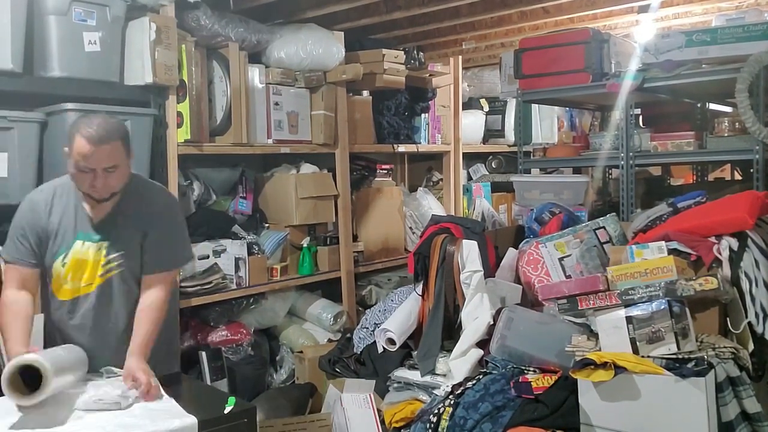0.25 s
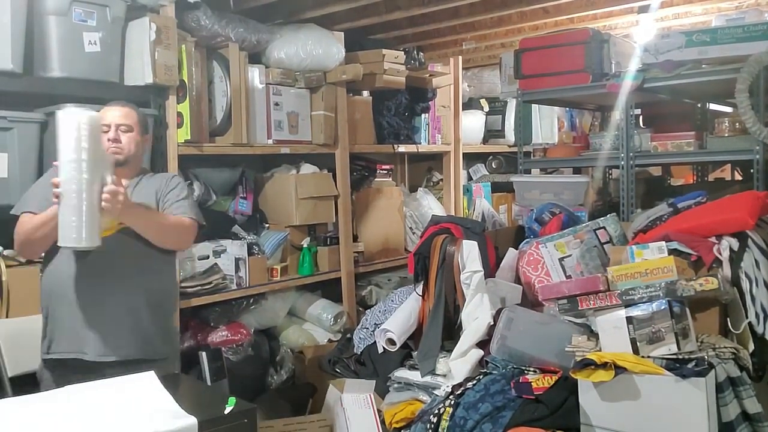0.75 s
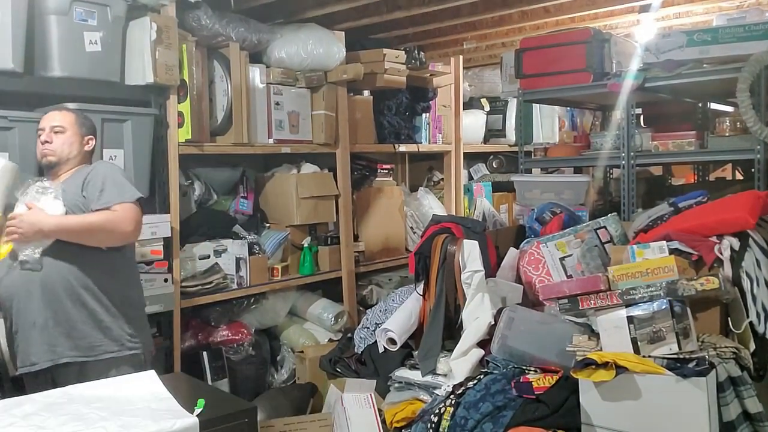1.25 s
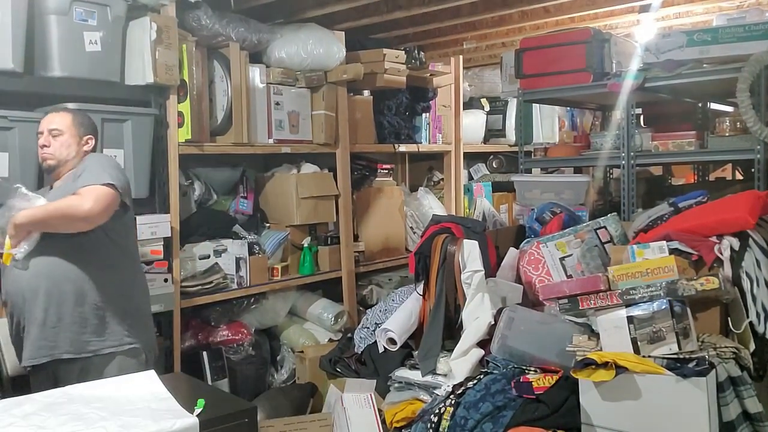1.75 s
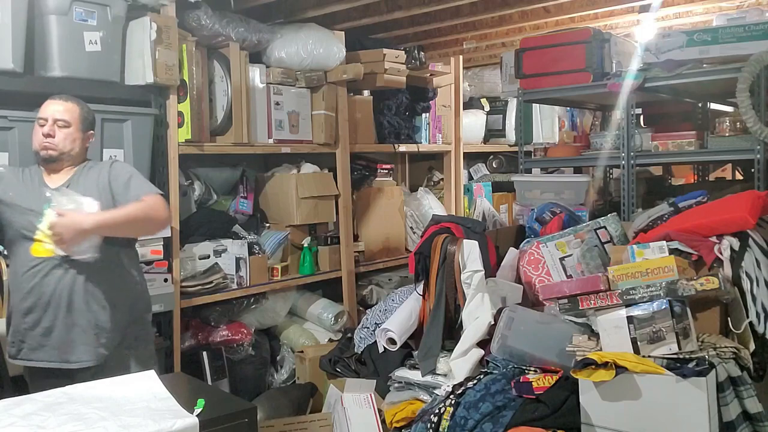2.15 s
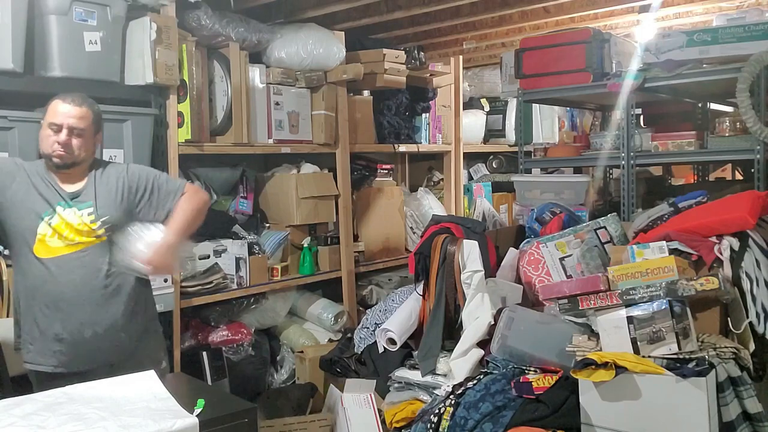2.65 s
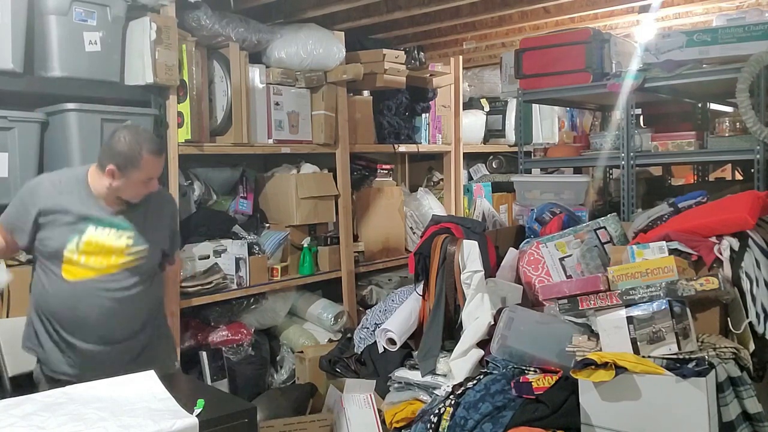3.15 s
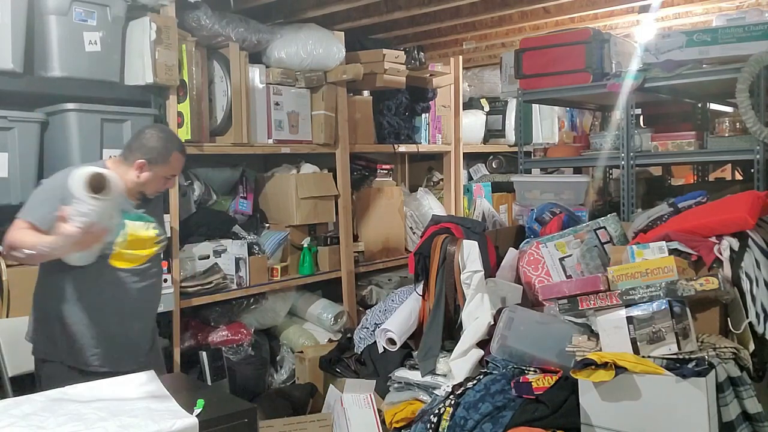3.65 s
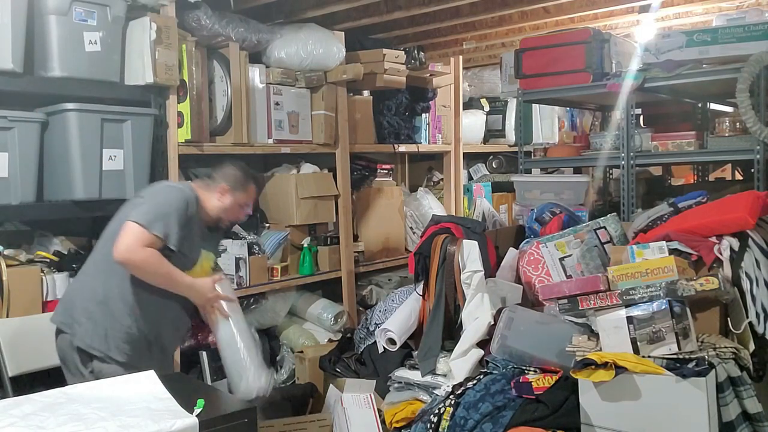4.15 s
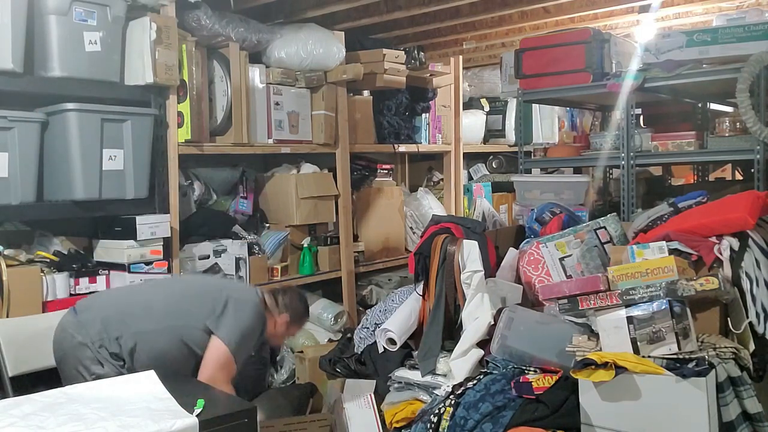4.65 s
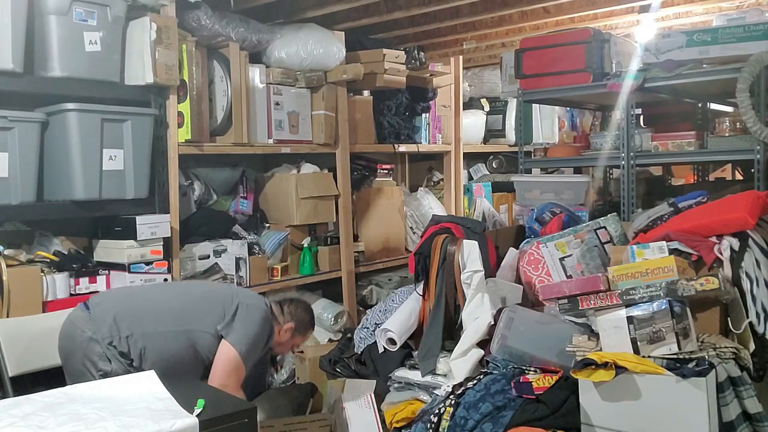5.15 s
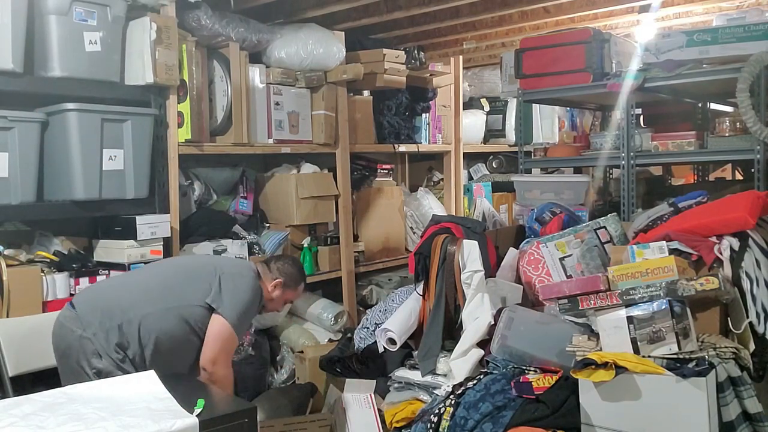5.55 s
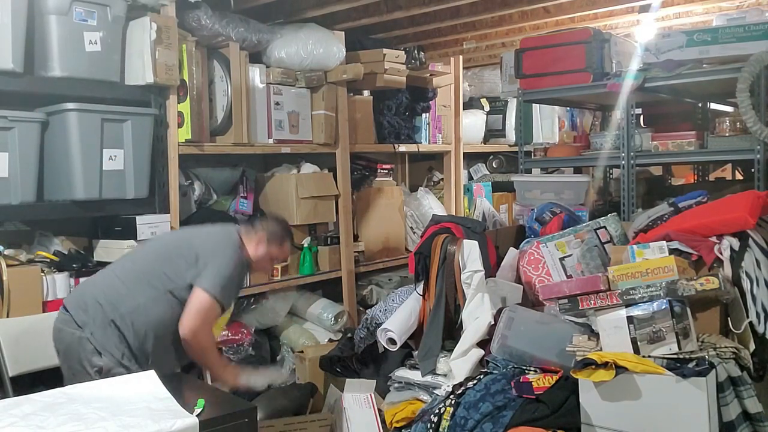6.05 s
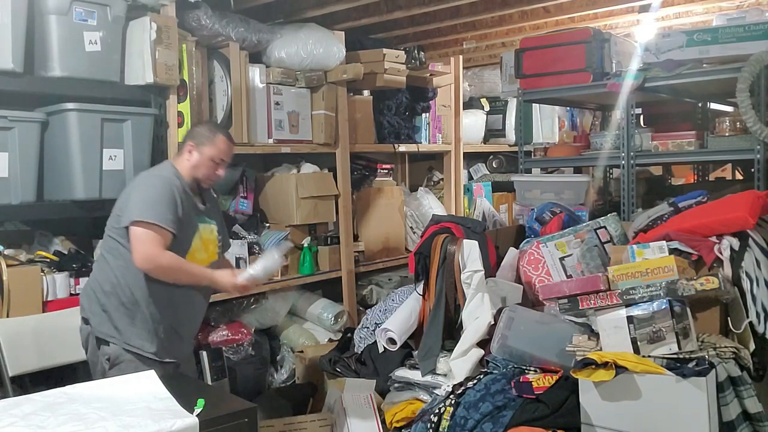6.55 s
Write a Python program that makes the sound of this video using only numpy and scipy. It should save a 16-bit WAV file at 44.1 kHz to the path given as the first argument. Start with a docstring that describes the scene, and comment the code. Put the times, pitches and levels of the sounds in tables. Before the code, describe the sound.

Close, crisp plastic wrap crinkles and slides in a cluttered storage room, with a light hollow cardboard knock and a heavy boxy thump. Just after three seconds a glass plate shatters very loudly, a heavy piece thuds, and shards clink and skitter to rest. Then quiet clothing swishes and a soft floor knock as a man bends down. A faint wavering hum continues; stereo, short room echo.

```python
"""A glass plate shatters: snaps ring its modes, a heavy piece lands, shards clink and tinkle to rest.
Before it, a man handles plastic wrap in a cluttered storage room: clicks and noise make film slide and crinkle.
Things knock together as decaying noise and hollow modes; his clothes swish in bunched, filtered noise
as he bends down and moves things on the floor. Under it, filtered noise makes a thin whine,
then a faint wavering hum."""
import sys
import numpy as np
from scipy import signal
from scipy.fft import rfft, irfft, next_fast_len
from scipy.io import wavfile

SR = 44100
rng = np.random.default_rng(int(sys.argv[2]) if len(sys.argv) > 2 else 0)


def generate_wav(signal):
    """Clip the signal to [-1, 1] and save it as 16-bit WAV at the path in sys.argv[1]."""
    frames = np.transpose(np.atleast_2d(signal))
    scaled = np.clip(frames, -1, 1) * 32767
    pcm = np.round(scaled).astype(np.int16)
    wavfile.write(sys.argv[1], SR, pcm)


N = 300321
TIME = np.arange(N) / SR
RING = TIME[:SR // 2]  # half a second for single hits
EDGE_HZ = 15950  # top of the band
HUM_START_S = 0.948

# Tables: levels are relative, before each layer's own gain.
# spectra of hum, early whine and room air: f/Hz, level/dB
HUM_SPECTRUM = [(200, -58), (310, -34.5), (350, -12), (374, -4), (388, -2), (404, -5), (440, -16),
                (490, -22), (620, -25), (1000, -52.5), (3000, -83)]
WHINE_SPECTRUM = [(1000, -48), (2800, -22), (3400, -9), (3750, 2), (4200, -6), (4800, -21), (8000, -47)]
AIR_SPECTRUM = [(30, 0.5), (200, -5.5), (900, -19), (5000, -23.5), (9000, -28.5), (13000, -16),
                (16000, -18)]
# echo decay across the band, before an overall scale: f/Hz, decay scale/s
ROOM_DECAY = [(100, 0.5), (1000, 0.13), (5000, 0.5), (15000, 0.13)]
# side against mid, for handling and for glass: f/Hz, level/dB
HANDLING_WIDTH = [(100, -16), (250, -15.5), (650, -7.5), (1400, -2), (3000, -4), (6000, 1), (16000, 2.5)]
GLASS_WIDTH = [(100, -15.5), (700, -16.5), (3000, -18), (6000, -11.5), (12000, -11.5)]

# big box bumped, its modes: f/Hz, level/dB, t60/s
BOX_MODES = [(44.8, -18, 0.36), (83.8, 0.5, 0.18), (136, -9, 0.13), (188, -3.5, 0.11), (229, -9, 0.075),
             (256, -4, 0.1), (1260, -18, 0.019)]
BOX_AT_S, BOX_DB = 1.651, -17
# board under the heaviest piece, its modes: f/Hz, level/dB, t60/s
BOARD_MODES = [(78, -12, .16), (116, -7, 0.062), (147, 1, 0.14), (172, -2.5, 0.13), (209, -8, .12),
               (406, -5, 0.082), (638, 0.5, .06)]
BOARD_AT_S, BOARD_DB = 3.322, -15
# carton set down on the floor, its modes: f/Hz, level/dB, t60/s
CARTON_MODES = [(58.3, -11.5, 0.46), (104.7, -9, 0.35), (137.5, -6, 0.32), (185.8, 0, 0.13),
                (295, -2.5, 0.065), (410, -6, 0.11), (706, -8, 0.13), (770, -15, 0.18), (1330, -20, 0.15)]
CARTON_AT_S, CARTON_DB = 4.863, -26
# knocks of the roll's cardboard core: t/s, level/dB
CORE_HITS_AT = [(1.1736, -22), (1.1865, -38)]
# hollow ring of that core: f/Hz, level/dB, t60/s
CORE_MODES = [(482, -4.5, 0.065), (659, 1.5, 0.083), (764, -1.5, 0.11), (937, 6.5, 0.039),
              (1083, -9, 0.065)]
# dull knocks: t/s, level/dB, body f/Hz, slope above the body/dB per octave, t60/s
KNOCK_EVENTS = [(1.173, -19, 720, -5, 0.13), (1.649, -5, 150, -5, 0.078), (1.651, -7.5, 1460, -6.5, 0.086),
                (2.149, -23, 1200, -5.5, 0.07), (2.169, -13, 480, -5, 0.056),
                (2.716, -19, 600, -4.5, 0.072), (3.192, -2.5, 1400, -8, .061),
                (3.221, -10.5, 650, -5, 0.056), (3.319, -1.5, 380, -4.8, .13),
                (4.863, -24.5, 290, -12.5, 0.097), (5.4145, -24, 600, -4.3, .11)]
KNOCK_BASS_DB = 7  # fall below the body, dB per octave

# soft pitched rubs: t/s, length/s, level/dB, centre f/Hz
RUB_STROKES = [(0.949, 0.3, -56, 830), (1.368, 0.1, -45.5, 693), (1.38, 0.21, -54, 222),
               (2.37, 0.172, -52, 515), (2.512, 0.17, -48.5, 332), (2.575, 0.36, -51, 2630),
               (4.563, 0.14, -72.5, 1380), (5.07, .05, -58, 2000), (5.867, 0.061, -58, 2043),
               (5.968, 0.059, -58.5, 1530)]
# swishes of clothes, one a movement: t/s, length/s, level/dB, rise/s
SWISH_STROKES = [(4.199, 0.27, -58.5, 0.012), (4.86, 0.026, -66.5, .015), (5.03, .17, -55, 0.069),
                 (5.269, 0.29, -51, 0.13), (5.407, 0.025, -40.5, 0.0046), (5.647, 0.029, -59, 0.015),
                 (5.865, 0.14, -55.5, 0.018), (6.182, 0.24, -54.5, 0.2), (6.54, 0.29, -63, 0.046)]
SWISH_SAG_DB_PER_S, SWISH_T60_S = 12.5, 0.27
# spectra of cloth and its fine hiss: f/Hz, level/dB
CLOTH_SPECTRUM = [(100, -21.5), (400, 4.5), (900, -5.5), (1700, -3), (3200, -3), (5800, -3), (8000, -11),
                  (16000, -63)]
HISS_SPECTRUM = [(1000, -27), (8000, -11), (10000, -4), (12000, 2), (16000, -12.5)]
HISS_DB, HISS_GROWTH = -29.5, 0.67  # level at full swish; dB of hiss per dB of swish

# pulls of film over itself: t/s, length/s, level/dB
FILM_PULLS = [(0.0, 0.097, -60.5), (0.165, 0.072, -53.5), (0.276, 0.61, -53), (0.372, 0.081, -47),
              (0.924, 0.41, -52.5), (1.366, 0.088, -39.5), (1.412, 0.65, -37), (2.098, 0.086, -37),
              (2.23, .73, -51.5), (2.37, 0.16, -46), (2.61, 0.1, -47.5), (4.2, .24, -60)]
PULL_RISE_S, PULL_SAG_DB_PER_S, PULL_T60_S = 0.052, 7, 0.29
# folds of film buckling: t/s, level/dB, duration scale/s
FILM_FOLDS = [(0.054, -42.5, 0.011), (0.077, -45.5, 0.012), (.1492, -40, 0.0046), (0.162, -27, .006),
              (0.198, -36, 0.048), (.398, -39, .013), (0.556, -45.5, .014), (0.615, -44, 0.011),
              (0.684, -41, 0.034), (.75, -46.5, .028), (.898, -37, 0.0036), (0.919, -40.5, .015),
              (1.008, -37, 0.0097), (1.182, -36, 0.04), (2.002, -37.5, .039), (2.124, -28.5, 0.0094),
              (2.212, -41, 0.0087), (2.304, -36.5, 0.0067), (2.356, -39.5, 0.019), (2.391, -36.5, 0.0039),
              (2.443, -37.5, 0.017), (2.489, -32, 0.0086), (2.675, -40.5, 0.015), (2.903, -36.5, 0.08)]
CRINKLE_TILT_DB = 0.14  # brightness of a fold against loose film, dB per octave
# spectra of film pressed to the body and film held free: f/Hz, level/dB
PRESSED_FILM = [(35, -35.5), (60, -8), (130, -21), (189, -11.5), (323, -8.5), (380, -6), (480, -8.5),
                (842, -5), (1110, -11.5), (1410, -6.5), (1820, -8.5), (4970, -6), (9350, -13),
                (13900, -6.5), (16000, -18.5)]
FREE_FILM = [(60, -11.5), (200, -5.5), (700, -4), (1800, -3.5), (4500, -1.5), (9000, -5.5), (13000, -4.5),
             (16000, -6.5)]
STRAY_PER_S, STRAY_DB = 70, -8.5  # single snaps in the slide: rate, and level against it

# small pieces tapping without a ring: t/s, level/dB, centre f/Hz
FLOOR_TAPS = [(3.404, -16.5, 2130), (3.587, -24.5, 744), (3.667, -34.5, 680), (3.703, -27, 840),
              (3.763, -34, 594), (3.854, -34, 690), (3.871, -31.5, 490), (3.912, -29.5, 1400),
              (4.026, -34, 700), (4.113, -39.5, 402), (4.232, -39, 800), (4.534, -46.5, 500),
              (4.572, -52, 450)]
# shards striking: t/s, level/dB, main f/Hz, decay scale/s, crack against ring/dB
SHARD_HITS = [(3.0798, -1.5, 11620, .25, -15), (3.1052, -0.5, 5140, .19, -2), (3.1448, -1, 2366, .15, -3),
              (3.158, -17, 5070, .13, 2), (3.1704, -6, 6410, .3, 4.5), (3.2377, -11.5, 5210, .14, 5),
              (3.2538, -12, 7600, .15, 5), (3.3066, -9, 7920, .15, -4), (3.4046, -13, 3770, .075, 4),
              (3.4421, -23, 3870, .14, 8), (3.463, -26, 3000, .13, 10.5), (3.483, -20.5, 5020, .13, 12),
              (3.5308, -19.5, 2473, .13, 14), (3.5471, -13, 6130, .15, -5), (3.586, -15, 3025, .18, 10.5),
              (3.6381, -17.5, 4520, .2, -5), (3.726, -27.5, 4160, .11, 9.5), (3.7596, -26, 7950, .11, -8),
              (3.7937, -17.5, 4930, .17, -3), (3.8432, -25, 5530, .1, 3), (3.91, -13, 10030, .09, -8),
              (3.925, -18, 4570, .07, 0), (3.9495, -25.5, 3280, .06, 11), (3.9908, -24, 5450, .07, 7),
              (4.0762, -38.5, 4180, .14, 10), (4.151, -41.5, 4050, .15, 15), (4.3196, -35, 5370, .16, 1.5),
              (4.348, -40.5, 4590, .15, 10), (4.3786, -33, 9080, .13, 5), (4.4095, -40.5, 7940, .15, 3),
              (4.4358, -37, 7400, .15, 3.5)]
# ring of the breaking plate: f/Hz, level/dB, decay scale/s (halved and capped below)
PLATE_MODES = [(1260, -21.5, 5.0), (3700, -10, 0.5), (5010, -2, 0.56), (5739, -20.5, 0.34),
               (6374, -12.5, 0.97), (7623, -9.5, 0.2), (8700, -8, 0.45), (9000, -26, 5.0), (8985, -16, 3.8),
               (9750, 0, 0.12), (9960, -4, 0.23), (10700, -17, 0.65), (11160, -2.5, 0.5), (12700, -23, 1.6),
               (12800, -13, 0.28), (14740, -14, 0.23)]
# spectra of splinters and of larger clattering pieces: f/Hz, level/dB
SPLINTER_SPECTRUM = [(300, -36.5), (1000, -4), (2000, -3), (5500, -1.5), (8000, -4), (11000, -3),
                     (13000, -8), (16000, -13.5)]
CLATTER_SPECTRUM = [(30, -13), (90, -11.5), (150, -2), (240, 3.5), (370, -7.5), (700, -0.5), (1500, -3),
                    (2400, -11), (5000, -30.5)]
# blows that throw splinters: t/s, level/dB
CRASH_BLOWS = [(3.076, -14.5), (3.102, -12), (3.143, -19), (3.156, -17), (3.323, -20), (3.588, -31.5),
               (3.79, -51)]
CRASH_RISE_S, CRASH_T60_S = 0.0041, 0.35  # the quick spray
SETTLE_DB, SETTLE_T60_S = -17.5, 1.386  # the skitter on the floor
REST_AT_S, REST_S = 4.58, 0.38  # force has run out by this time; length of the run-out
# share of the force that rings the plate before and at the break; then it fades
BREAK_AT_S, WHOLE_DB, BROKEN_DB, CRUMBLE_T60_S = 3.104, -6.5, 5.5, 0.7
# growths are dB of layer per dB of force
CLATTER_DB, CLATTER_GROWTH = -15.5, 0.65
RUMBLE_DB, RUMBLE_HZ, RUMBLE_GROWTH = -45, 85, 0.35


def amp(db):
    """Decibels to gain."""
    return 10 ** (np.asarray(db) / 20)


def unit(x):
    """Scales to rms 1."""
    return x / np.sqrt(np.mean(x ** 2) + 1e-20)


def read(points, hz):
    """Reads a table on a log-frequency axis."""
    f, value = np.transpose(points)
    return np.interp(np.log(hz + 1), np.log(f + 1), value)


def fade(t, t60):
    """Exponential decay, down 60 dB after t60 seconds."""
    return np.exp(-np.log(1000) * t / np.maximum(t60, 1e-3))


def add(mix, s, sound):
    """Mixes a sound in at s seconds."""
    part = mix[max(round(s * SR), 0):][:len(sound)]
    part += sound[:len(part)]


def colour(x, spectrum):
    """Filters by a spectrum in dB."""
    size = next_fast_len(len(x))
    gain = amp(read(spectrum, np.fft.rfftfreq(size, 1 / SR)))
    return irfft(rfft(x, size) * gain, size)[:len(x)]


def noise(spectrum, size=N):
    """Coloured noise of rms 1."""
    return unit(colour(rng.standard_normal(size), spectrum))


def hump(hz, drop_db):
    """A spectrum peaking at hz, down drop_db one octave away and ever steeper beyond."""
    return [(hz * 2. ** k, -drop_db * abs(k) ** 1.5) for k in range(-4, 4)]


def clicks(per_s, spread_db):
    """Random snaps of either sign, a few much larger than the rest, at rms 1."""
    size = amp(spread_db * np.minimum(rng.exponential(1, N), 4))
    sign = rng.choice([-1, 1], N)
    return unit(size * sign * (rng.random(N) < per_s / SR))


def clumps(per_s, depth_db):
    """A random gain of rms 1: contacts come in bunches."""
    knots = rng.standard_normal(int(TIME[-1] * per_s) + 2)
    drift = np.interp(TIME * per_s, np.arange(len(knots)), knots)
    return unit(amp(depth_db * drift))


def together(gains):
    """Unrelated sounds add in power."""
    return np.sqrt(sum(gain ** 2 for gain in gains))


def stroke(s, length, rise, sag_db_per_s, t60):
    """Gain of one movement: it rises, slackens steadily, then also dies away."""
    t = np.maximum(TIME - s, 0)
    return np.minimum(t / rise, 1) * amp(-sag_db_per_s * t) * fade(np.maximum(t - length, 0), t60)


def spread(source, width):
    """Two draws of a sound: one shared by left and right, one that sets them apart."""
    mid, side = source(), colour(source(), width)
    return np.array([mid + side, mid - side])


def reflections(t60_scale):
    """Sparse echoes from the shelves, each band dying at its own speed."""
    sign = rng.choice([-1., 1.], len(RING))
    taps = sign * (rng.random(len(RING)) < 3000 / SR) * (RING > 0.003)
    hz, t, bands = signal.stft(taps, SR, nperseg=256)
    decay = fade(t, t60_scale * read(ROOM_DECAY, hz)[:, None])
    tail = signal.istft(bands * decay, SR, nperseg=256)[1]
    return tail / np.linalg.norm(tail)


def background():
    """Noise in a high band whines, then a narrow low band hums and wavers; faint air lies under both."""
    humming = np.clip((TIME - HUM_START_S) / 0.005, 0, 1)
    hum = amp(-54.5) * humming * noise(HUM_SPECTRUM)
    whine = amp(-55.5) * (1 - humming) * noise(WHINE_SPECTRUM)
    return hum + whine + amp(-71.5) * noise(AIR_SPECTRUM)


def struck(modes, build):
    """Damped modes of a large object; `build` is the t60 of its swell."""
    ring = sum(amp(db) * np.sin(2 * np.pi * hz * RING) * fade(RING, t60) for hz, db, t60 in modes)
    return ring * (1 - fade(RING, build))


def hollow_things():
    """A box and a board boom under heavy blows; the roll's core and a carton give hollow knocks."""
    out = np.zeros(N)
    add(out, BOX_AT_S, -amp(BOX_DB) * struck(BOX_MODES, build=0.011))
    add(out, BOARD_AT_S, amp(BOARD_DB) * struck(BOARD_MODES, build=0.0065))
    for s, db in CORE_HITS_AT:
        add(out, s, amp(db) * struck(CORE_MODES, build=0.013))
    add(out, CARTON_AT_S, amp(CARTON_DB) * struck(CARTON_MODES, build=0.029))
    return out


def knocks():
    """Damped blows: a contact tick, a short burst of body noise and a weak, longer rattle."""
    out = np.zeros(N)
    octaves = np.arange(-5, 8)
    for s, db, hz, slope_db, t60 in KNOCK_EVENTS:
        spectrum = [(hz * 2. ** k, k * (KNOCK_BASS_DB if k < 0 else slope_db)) for k in octaves]
        rattle = amp(-24.5) * fade(RING, 0.56)
        blow = np.minimum(RING / 0.0027, 1) * (fade(RING, t60) + rattle)
        tick = amp(2.5) * np.minimum(RING / 0.0005, 1) * fade(RING, 0.007)
        add(out, s, amp(db - 7.5) * (tick + blow) * noise(spectrum, size=len(RING)))
    return out


def rubs():
    """Soft rubbing: narrow noise in short swelling strokes."""
    out = np.zeros(N)
    for s, length, db, hz in RUB_STROKES:
        swell = signal.windows.tukey(round(length * SR), 0.5)
        add(out, s, amp(db) * swell * noise(hump(hz, drop_db=26.0), size=len(swell)))
    return out


def clothes():
    """Cloth catches and slips in uneven rubs, with a fine hiss on top."""
    slips = unit(clicks(per_s=2000, spread_db=4.0) + 0.92 * rng.standard_normal(N))
    fibres = clumps(per_s=34, depth_db=2) * slips
    swish = together(amp(db) * stroke(s, length, rise, SWISH_SAG_DB_PER_S, SWISH_T60_S)
                     for s, length, db, rise in SWISH_STROKES)
    rubbing = amp(-1.5) * swish * unit(colour(fibres, CLOTH_SPECTRUM))
    return rubbing + amp(HISS_DB) * swish ** HISS_GROWTH * noise(HISS_SPECTRUM)


def film_slide():
    """Film pulled over itself hisses with tiny slips; pressed to the body it sounds fuller."""
    slips = unit(clicks(per_s=4000, spread_db=4.0) + 1.5 * rng.standard_normal(N))
    slips = clumps(per_s=120, depth_db=2.0) * slips
    slips = slips + amp(STRAY_DB) * clicks(per_s=STRAY_PER_S, spread_db=2.5)
    pressed = np.clip((TIME - HUM_START_S) / 0.022, 0, 1)
    free_film = (1 - pressed) * unit(colour(slips, FREE_FILM))
    pressed_film = pressed * unit(colour(slips, PRESSED_FILM))
    pull = together(amp(db) * stroke(s, length, PULL_RISE_S, PULL_SAG_DB_PER_S, PULL_T60_S)
                    for s, length, db in FILM_PULLS)
    return amp(1.28) * pull * (free_film + pressed_film)


def film_crinkles():
    """Folds of film buckle and let go in short clumps of snaps."""
    out = np.zeros(N)
    snaps = clicks(per_s=7000, spread_db=3.0)
    t = RING[:SR // 8]
    spectrum = [(f, d + CRINKLE_TILT_DB * np.log2(f / 5000)) for f, d in FREE_FILM]
    for s, db, length in FILM_FOLDS:
        clump = np.minimum(t / (0.48 * length), 1) * fade(np.maximum(t - 0.7 * length, 0), 0.033)
        fold = unit(colour(snaps[round(s * SR):][:len(t)], spectrum))
        add(out, s, amp(db) * clump * fold)
    return out


def shard_ring(hz, t60, scatter=.55, count=20):
    """One piece of glass: a main mode at hz among weaker, unrelated ones."""
    place, height, life = rng.standard_normal((3, count, 1))
    modes, size = hz * np.exp(scatter * place), amp(3.5 * height)
    modes[0], size[0] = hz, size.max()
    size = size * (modes < EDGE_HZ)
    t = RING[:SR // 7]
    ring = size * np.sin(2 * np.pi * modes * t) * fade(t, t60 * np.exp(0.15 * life))
    return ring.sum(0) / np.linalg.norm(size)


def shards():
    """Each falling piece gives a crack full of short-lived modes and a brief ring; others only tap."""
    out = np.zeros(N)
    t = RING[:SR // 7]
    for s, db, hz, t60, crack_db in SHARD_HITS:
        ring = shard_ring(hz, 0.8 * t60)
        other_edge = amp(-4) * shard_ring(hz, t60 / 2)
        add(ring, rng.uniform(0.0025, 0.009), other_edge)  # it lands just after the first
        grit = fade(t, 0.03) * noise(hump(hz, drop_db=4.0), size=len(t))
        clink = shard_ring(np.sqrt(hz * 7000), t60=0.064, scatter=.6, count=36)
        crack = amp(crack_db - 3) * (grit + clink)
        add(out, s, amp(db - 11) * np.minimum(t / 0.0013, 1) * (crack + ring))
    for s, db, hz in FLOOR_TAPS:
        tap = np.minimum(t / 0.00078, 1) * fade(t, 0.043)
        add(out, s, amp(db) * tap * noise(hump(hz, drop_db=7), size=len(t)))
    return out


def spray(s):
    """Force of the splinters thrown by one blow: a quick spray and a long skitter."""
    t = np.maximum(TIME - s, 0)
    skitter = amp(SETTLE_DB) * fade(t, SETTLE_T60_S)
    return np.minimum(t / CRASH_RISE_S, 1) * together([fade(t, CRASH_T60_S), skitter])


def plate_ring(force):
    """Cracks racing through the plate excite its modes, less and less as it crumbles."""
    crumble = fade(np.maximum(TIME - BREAK_AT_S, 0), CRUMBLE_T60_S)
    share = np.where(TIME < BREAK_AT_S, amp(WHOLE_DB), amp(BROKEN_DB) * crumble)
    plate = sum(amp(db) * np.sin(2 * np.pi * hz * RING) * fade(RING, min(t60 / 2, 0.2))
                for hz, db, t60 in PLATE_MODES)
    strikes = force * share * clicks(per_s=820, spread_db=1.0)
    return signal.oaconvolve(strikes, plate / np.linalg.norm(plate))[:N]


def splinter_tinkle(force, count=48):
    """Splinters collide and ping, each at its own pitch."""
    hits, tinkle = force * clicks(per_s=500, spread_db=5.5), np.zeros(N)
    pitches = np.geomspace(2100, 13500, count)
    pieces = [shard_ring(hz, t60=0.076, scatter=0.28, count=3) for hz in pitches]
    for at in np.flatnonzero(hits):
        piece = pieces[at % count]
        add(tinkle, at / SR, hits[at] * piece / np.linalg.norm(piece))
    return tinkle


def shatter():
    """Cracks ring the plate, splinters collide, larger pieces clatter; a faint low rumble lies under the crash."""
    run_out = np.clip((REST_AT_S - TIME) / REST_S, 0, 1)
    force = together(amp(db) * spray(s) for s, db in CRASH_BLOWS) * run_out
    splinters = unit(colour(clicks(per_s=2200, spread_db=4.0), SPLINTER_SPECTRUM))
    cracks = force * clumps(per_s=180, depth_db=3) * splinters
    # clatter and rumble fall off more slowly than the force itself
    clatter = force ** CLATTER_GROWTH * unit(colour(clicks(per_s=550, spread_db=1), CLATTER_SPECTRUM))
    rumble = force ** RUMBLE_GROWTH * noise(hump(RUMBLE_HZ, drop_db=8.5))
    glass = amp(-5.5) * cracks + amp(-4.5) * plate_ring(force) + amp(-2.5) * splinter_tinkle(force)
    return glass + amp(CLATTER_DB) * clatter + amp(RUMBLE_DB) * rumble


def handling_layers():
    """All the diffuse layers around the glass, summed."""
    return background() + knocks() + rubs() + clothes() + film_slide() + film_crinkles()


def scene():
    """Handling noise is diffuse, the glass is compact and central; the crowded room adds a short tail."""
    handling = spread(handling_layers, HANDLING_WIDTH) + hollow_things()
    # while the man stands at the left, his sounds reach the right ear later
    lag_s = np.interp(TIME, [3.0, 3.07], [.00023, 0])
    heard_at = np.arange(N) - np.round(lag_s * SR).astype(int)
    handling[1] = handling[1][np.maximum(heard_at, 0)]
    dry = handling + spread(lambda: shatter() + shards(), GLASS_WIDTH)
    return np.array([ear + amp(-16.5) * signal.oaconvolve(ear, reflections(t60_scale=0.92))[:N]
                     for ear in dry])


def record(dry):
    """Soft overload on the highest peaks, then the band limit."""
    rounded = 1.05 * np.tanh(dry / 1.05)
    low_pass = signal.firwin(511, EDGE_HZ, window=("kaiser", 9), fs=SR)
    return signal.oaconvolve(rounded, low_pass[None], "same")


dry = scene()
out = record(dry)
generate_wav(out)
```